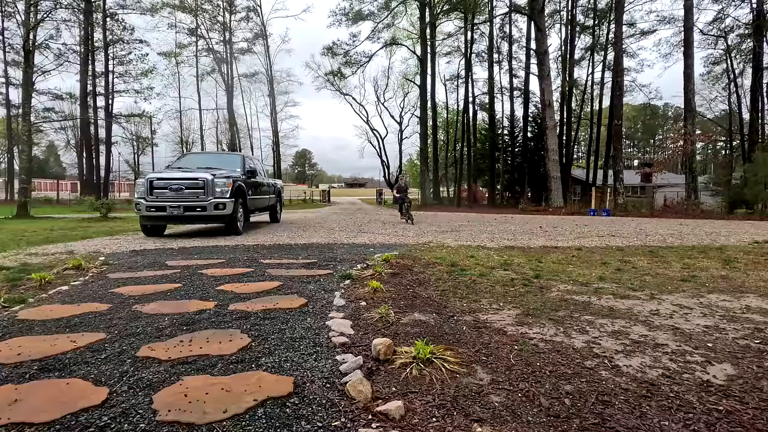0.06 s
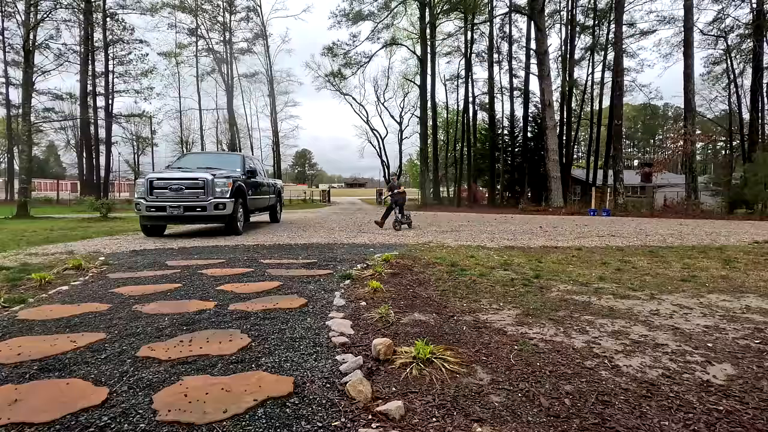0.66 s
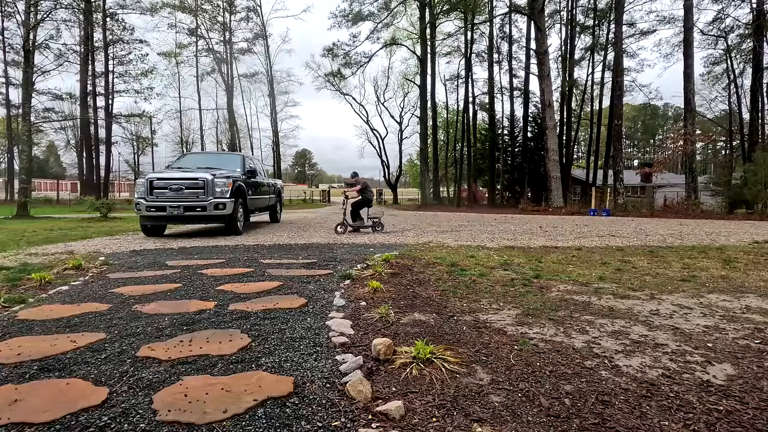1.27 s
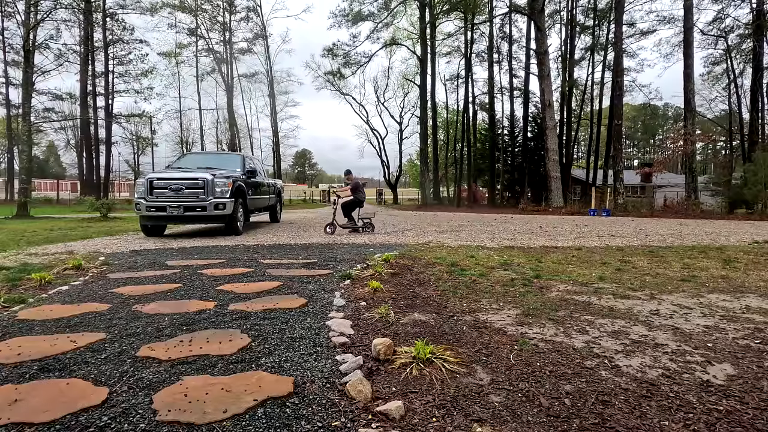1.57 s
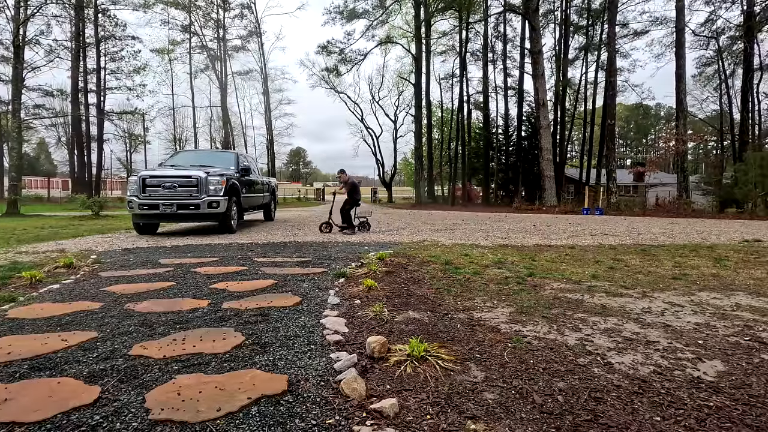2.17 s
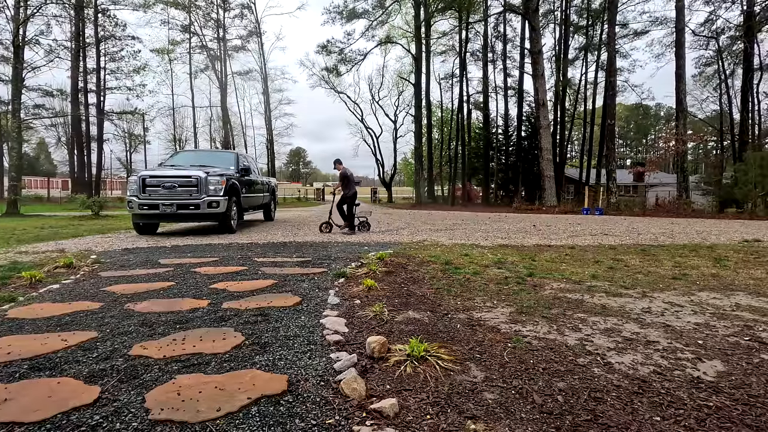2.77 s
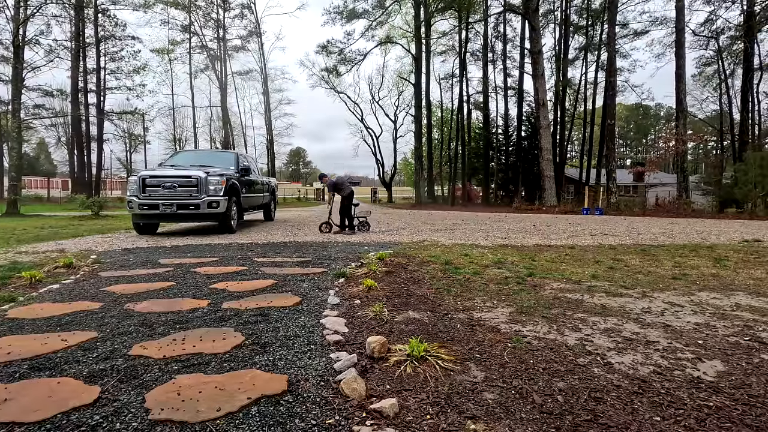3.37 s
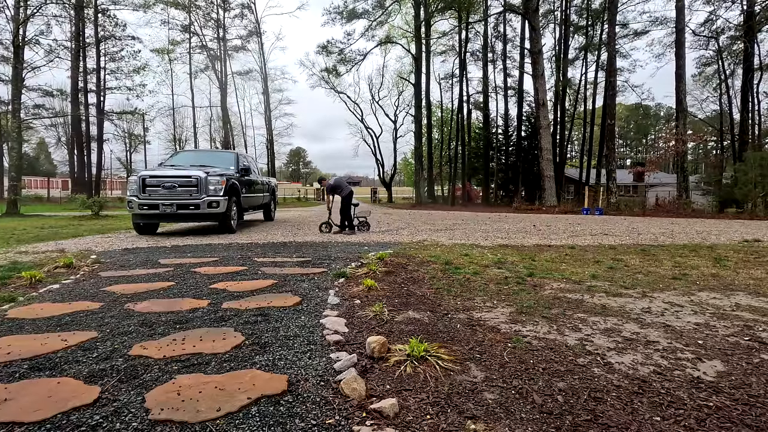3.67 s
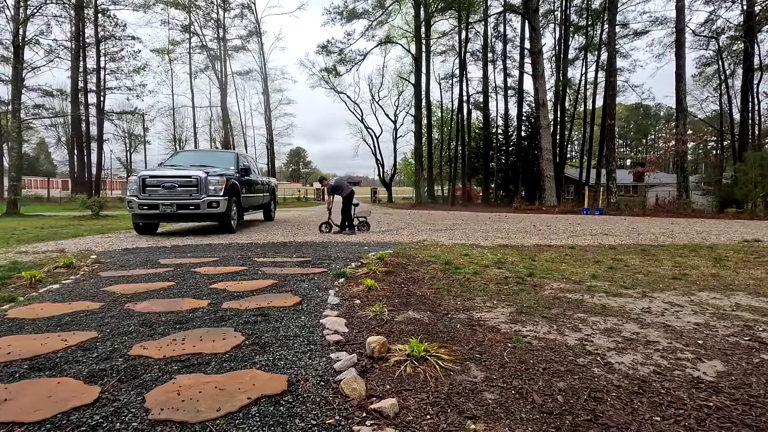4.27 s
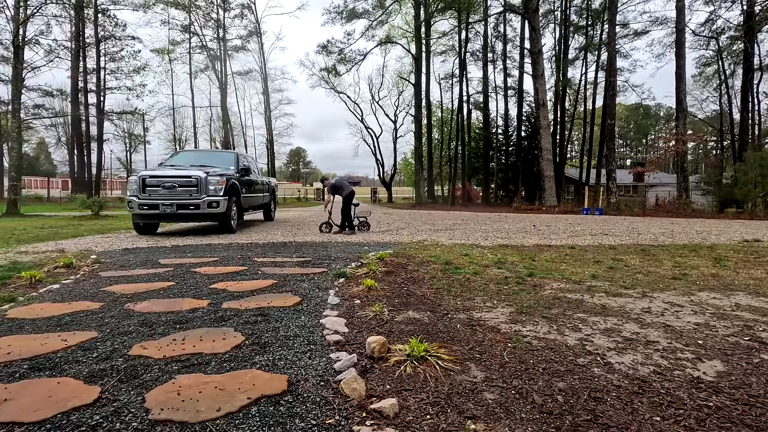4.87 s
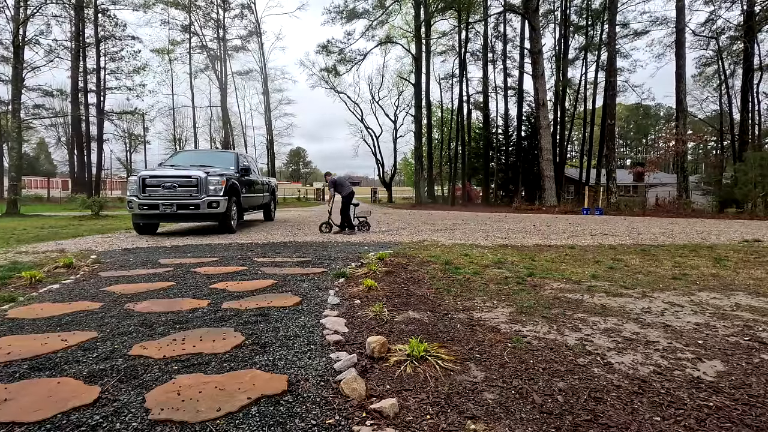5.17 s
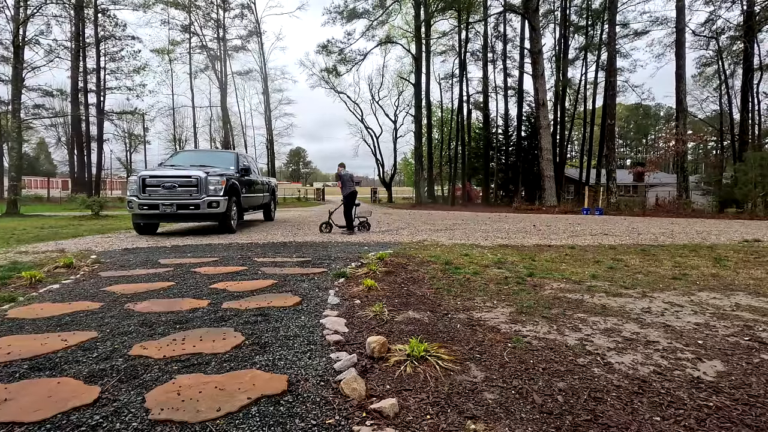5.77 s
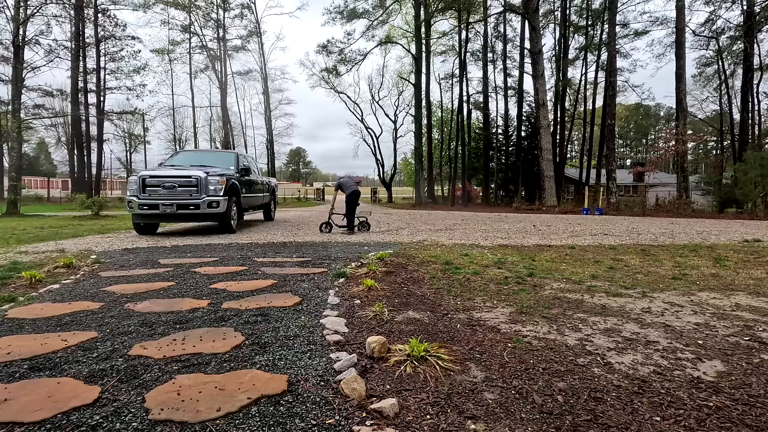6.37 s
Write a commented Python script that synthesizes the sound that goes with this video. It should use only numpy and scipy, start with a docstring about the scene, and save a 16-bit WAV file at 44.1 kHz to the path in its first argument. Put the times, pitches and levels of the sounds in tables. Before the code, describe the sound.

Outdoors among trees, small scooter wheels grind through gravel with snapping pebbles and hollow knocks, then slow to a halt. In the quiet that follows come light foot scuffs, small ticks and chirping birds. Past the middle, a sharp metal clack rings out with thumps from the deck. The birdsong grows louder over a soft traffic hum and rustling trees, with the scooter heard near the centre.

```python
"""A small scooter rolls over a gravel drive: the tyres rumble, stones crunch and bumps rattle hollowly. After
two seconds it stops. Shoes shift on the stones, fittings tick, a songbird warbles among the trees and a far
bird gives long, level calls. At 4.6 s a loud latch-like clack comes with duller knocks of the deck. All along,
a low traffic hum and the wash of the trees sound, and the background grows steadily louder, holding steady near
the end."""
import sys
import numpy as np
from scipy import signal
from scipy.fft import rfft, irfft, next_fast_len
from scipy.io import wavfile
from scipy.ndimage import uniform_filter1d

SR = 44100
rng = np.random.default_rng(int(sys.argv[2]) if len(sys.argv) > 2 else 0)


def wav_record(signal):
    """Record a signal, one row per channel, as 16-bit PCM in the file named by sys.argv[1]."""
    frames = np.transpose(np.atleast_2d(signal))
    bounded = np.clip(frames, -1, 1)
    # unit amplitude maps onto the largest positive 16-bit level
    quanta = np.round(bounded * 32767).astype(np.int16)
    wavfile.write(sys.argv[1], SR, quanta)


N = 287091
TIME = np.arange(N) / SR


def amp(db):
    """Decibels to amplitude ratio."""
    return 10 ** (np.asarray(db) / 20)


def unit(x):
    """Normalisation to rms 1."""
    return x / np.sqrt(np.mean(x ** 2) + 1e-20)


def read(points, hz):
    """Interpolation of a table on a log-frequency axis."""
    f, value = np.transpose(points)
    return np.interp(np.log(hz + 1), np.log(f + 1), value)


def add(mix, s, sound):
    """Superposition: a sound joins the mix at time s."""
    part = mix[max(round(s * SR), 0):][:len(sound)]
    part += sound[:len(part)]


def colour(x, points):
    """Spectral shaping by a table of gains, at rms 1."""
    return unit(irfft(rfft(x) * amp(read(points, np.fft.rfftfreq(len(x), 1 / SR))), len(x)))


def noise(points, size=N):
    """Filtered Gaussian noise of a given spectrum."""
    return colour(rng.standard_normal(size), points)


def wander(hz, size=N):
    """Random modulation: noise low-passed at hz, at rms 1."""
    n = next_fast_len(max(size, SR // 5))
    rolloff = 1 + (np.fft.rfftfreq(n, 1 / SR) / hz) ** 4
    return unit(irfft(rfft(rng.standard_normal(n)) / rolloff, n))[:size]


def hump(s, length):
    """A raised-cosine pulse of height 1 centred on time s."""
    return np.cos(np.pi * np.clip((TIME - s) / length, -.5, .5)) ** 2


def swell(db, db_per_s, until_s=5.78):
    """Exponential growth: a gain that climbs to db, then holds."""
    return amp(db + db_per_s * np.minimum(TIME - until_s, 0))


def patchy(x, depth_db, span_s, span_hz):
    """Random amplitude modulation: each region of the spectrum swells and fades on its own."""
    hz, t, z = signal.stft(x, SR, nperseg=512, noverlap=384)
    field = rng.standard_normal(z.shape)
    for axis, size in enumerate([span_hz / hz[1], span_s / t[1]]):
        field = uniform_filter1d(field, max(int(size), 1), axis)
    return unit(signal.istft(z * amp(depth_db * unit(field)), SR, nperseg=512, noverlap=384)[1][:N])


def impacts(per_s, spread_db):
    """A Poisson train of impulses: many small, a few large."""
    size = amp(spread_db * np.minimum(rng.exponential(1, N), 4))
    return unit(size * rng.choice([-1, 1], N) * (rng.random(N) < per_s / SR))


def bounce(x, share, delay_s=.00345):
    """Comb filtering: one early reflection off a hard surface interferes with the direct sound."""
    return (x + share * np.interp(TIME - delay_s, TIME, x, left=0)) / np.hypot(1, share)


def trees(x, wet_db):
    """Reverberation by scattering: trunks return a thin tail, each band decaying at its own rate."""
    # decay of the tail: frequency_hz, t60_s
    decay = [(200, 0.14), (1200, 0.5), (3500, 0.32), (12000, 0.32)]
    echoes = rng.standard_normal(SR) * (rng.random(SR) < 2000 / SR) * (TIME[:SR] > .008)
    hz, t, z = signal.stft(echoes, SR, nperseg=256)
    tail = signal.istft(z * amp(-60 * t / read(decay, hz)[:, None]), SR, nperseg=256)[1]
    return x + amp(wet_db) * signal.fftconvolve(x, tail / np.linalg.norm(tail))[:N]


def diffuse(x, width):
    """A diffuse field: sound scattered from all around arrives with unrelated phases."""
    hz, t, z = signal.stft(x, SR, nperseg=512, noverlap=384)
    z = z * np.exp(2j * np.pi * rng.random(z.shape)) * amp(read(width, hz))[:, None]
    return signal.istft(z, SR, nperseg=512, noverlap=384)[1][:N]


def air():
    """Broadband ambient noise: far traffic hum, a gusty wash from the trees and a thin hiss."""
    # spectra of the three layers: frequency_hz, density_db
    hum_spectrum = [(12, -62), (20, -34), (32, -15), (64, 0), (87, 2.5), (129, 3.5), (177, -2.5),
                    (211, -14.5), (261, -11), (300, -12.5), (330, -4), (430, -13), (730, -120)]
    wash_spectrum = [(120, -33), (200, 3.5), (260, 1), (330, -1.5), (400, -1), (550, -4), (950, -4),
                     (1400, -9), (1870, -15.5), (2600, -16), (3770, -18.5), (4600, -24), (5200, -47),
                     (7000, -66)]
    hiss_spectrum = [(2650, -26), (4500, -5.5), (5200, -7), (6000, -8), (6800, -7.5), (8400, -11),
                     (11000, -15.5), (15000, -17), (16000, -26)]
    # soft gusts in the trees: middle_s, length_s, extra_db
    gusts = [(3.474, 0.43, 3), (4.25, 0.28, 1.5)]
    gust_db = sum(db * hump(s, length) for s, length, db in gusts)
    wash = patchy(noise(wash_spectrum), depth_db=3, span_s=.049, span_hz=200)
    hiss = patchy(noise(hiss_spectrum), depth_db=3, span_s=.031, span_hz=400)
    return (swell(-40.5, db_per_s=2.5) * noise(hum_spectrum)
            + swell(-41.5 + gust_db, db_per_s=2) * wash
            + swell(-55, db_per_s=1.77) * hiss)


def bird(notes, waver, waver_hz, flutter_db, harmonics=((1, 0),)):
    """Frequency modulation: notes glide through three pitches, trembling by the fraction waver."""
    out = np.zeros(N)
    for s, length, start, middle, end, db in notes:
        n = int(length * SR)
        glide_hz = np.polyval(np.polyfit([0, .5, 1], [start, middle, end], 2), np.linspace(0, 1, n))
        hz = glide_hz * (1 + waver * wander(waver_hz, n))
        phase = 2 * np.pi * np.cumsum(hz) / SR
        tone = sum(amp(level) * np.sin(round(k) * phase) for k, level in harmonics)
        flutter = amp(flutter_db * wander(99, n))
        add(out, s, amp(db) * unit(tone * flutter) * signal.windows.tukey(n, .35))
    return out


def chatter(count=240):
    """Randomly timed frequency sweeps: faint chirps from deeper in the wood, growing louder."""
    when, pitch, slope, faintness, length = rng.random((5, count))
    start_s, length_s = 2 + 4.5 * when, .014 + .03 * length
    hz, glide = 2400 + 2100 * pitch, 1 + .2 * (slope - .5)
    notes = np.c_[start_s, length_s, hz / glide, hz, hz * glide, -9 * faintness]
    return swell(-50, db_per_s=3) * bird(notes, waver=.011, waver_hz=200, flutter_db=4)


def far_bird():
    """A missing fundamental: level, slightly throbbing calls whose second harmonic carries furthest."""
    # calls: start_s, length_s, start_hz, middle_hz, end_hz, level_db
    calls = [(2.43, .35, 605, 620, 611, -52), (3.85, 0.32, 608, 621, 607.5, -50),
             (4.17, 0.23, 618, 630, 604, -53.5), (5.715, 0.153, 611.6, 608.5, 619.5, -42),
             (5.88, .135, 606, 619, 630, -42)]
    # overtones of the voice: harmonic_number, level_db
    throat = [(2, 3), (3, -13.5), (4, -11), (5, -58), (6, -8)]
    return trees(bird(calls, waver=.005, waver_hz=70, flutter_db=2.5, harmonics=throat), wet_db=-5)


def syllables(rows, oct_per_s, waver):
    """Exponential sweeps: notes of one kind glide at the same rate and tremble alike."""
    points = np.array([0, .5, 1])
    notes = [(s, length, *hz * 2 ** (oct_per_s * length * points), db) for s, length, hz, db in rows]
    return bird(notes, waver=waver, waver_hz=270, flutter_db=2.5)


def songbird():
    """Modulated pure tones: slight tremble leaves a note clean; deep tremble adds raspy sidebands."""
    # four kinds of syllable: start_s, length_s, start_hz, level_db
    whistles = [(2.557, 0.036, 3200, -51), (3.204, 0.029, 3180, -47), (3.724, .05, 2740, -53),
                (3.799, 0.037, 3220, -54), (3.898, .049, 4280, -50), (4.205, 0.036, 4540, -52),
                (4.242, 0.045, 3770, -54), (4.43, 0.25, 4600, -52.5), (4.792, 0.038, 4630, -47.5),
                (5.115, 0.02, 3700, -46.5), (5.183, .041, 2900, -47.5), (6.085, .08, 3480, -47),
                (6.374, 0.041, 3850, -48.5)]
    rises = [(2.751, 0.043, 2070, -51), (3.25, 0.21, 3220, -59.5), (3.4, .047, 2070, -53),
             (3.5, 0.055, 3800, -57), (5.226, 0.084, 2176, -42), (5.599, 0.045, 2120, -45),
             (6.015, 0.062, 2160, -42.5), (6.435, 0.082, 2174, -38.5)]
    falls = [(2.04, .086, 4600, -59), (2.49, 0.037, 3350, -57), (2.745, 0.032, 3500, -54),
             (4.822, 0.067, 4250, -43.5), (5.455, 0.098, 4650, -42.5), (5.915, 0.026, 3050, -44),
             (6.152, 0.048, 3450, -41)]
    buzzes = [(4.97, 0.095, 3090, -41), (5.618, 0.073, 2740, -44.5)]
    return (syllables(whistles, oct_per_s=0, waver=.008)
            + syllables(rises, oct_per_s=2.5, waver=.008)
            + syllables(falls, oct_per_s=-6.3, waver=.0515)
            + syllables(buzzes, oct_per_s=0, waver=.086))


def crunch(per_s, spread_db, clump_db, ring_s, kinds=10):
    """Shot noise: stones collide in clumps, each kind with its own short impulse response."""
    # spectrum of grinding stones: frequency_hz, density_db
    spectrum = [(880, -12), (1500, -18), (1610, -6), (1760, -4), (1880, -9), (2160, -15.5), (2300, -8),
                (3620, -2), (4590, -2.5), (5050, 0.5), (6310, 1.5), (7760, -1.5), (11800, -11.5),
                (16000, -28)]
    out, t = np.zeros(N), TIME[:700]
    for _ in range(kinds):
        clatter = unit(rng.standard_normal(len(t)) * np.exp(-t / ring_s))
        out += signal.oaconvolve(impacts(per_s / kinds, spread_db), clatter)[:N]
    return colour(out * amp(clump_db * wander(30)), spectrum)


def shoes():
    """Granular friction: light, sparse crunches as the rider shifts weight."""
    # scuffs on the stones: start_s, length_s, level_db
    scuffs = [(2.007, 0.3, -60), (2.23, .07, -53.5), (2.734, 0.22, -60.5), (3, 0.31, -53),
              (3.287, 0.4, -61.5), (4.68, 0.21, -53), (5.375, 0.11, -47), (5.572, 0.093, -47),
              (5.664, 0.27, -46.5), (5.876, 0.3, -56)]
    weight = np.zeros(N)
    for s, length, db in scuffs:
        add(weight, s, amp(db) * signal.windows.tukey(int(length * SR), .6))
    grains = crunch(per_s=900, spread_db=4, clump_db=2, ring_s=.0017)
    return weight * patchy(grains, depth_db=3, span_s=.02, span_hz=700)


def ticks(half_width_oct=.63, rise_s=.00057):
    """Impact transients: small hard contacts excite dense modes that die in hundredths of a second."""
    # pebbles and fittings snapping: start_s, relative_db, t60_s, centre_hz
    contacts = [(.08, -14.5, .03, 6000), (.117, -11, 0.019, 6400), (.177, -14, .035, 7000),
                (0.262, -19, .04, 5970), (0.375, -17, .024, 5000), (.513, -12, .016, 4900),
                (2.014, -34.5, .023, 7360), (2.358, -30, 0.022, 3900), (3.19, -41, 0.037, 6000),
                (3.513, -37, .02, 4000), (4.173, -33.5, 0.031, 4200), (5.05, -32, 0.043, 4700),
                (5.258, -28.5, 0.03, 4960), (5.418, -38, .03, 6000), (5.581, -33.5, .03, 8000),
                (5.691, -34, .02, 7000), (5.735, -29.5, 0.056, 7000)]
    out, t = np.zeros(N), TIME[:SR // 8]
    grid_hz = np.geomspace(100, SR / 2, 40)
    air_db = -10 * np.log10(1 + (grid_hz / 11500) ** 8)  # distance dulls the top
    for s, db, t60, hz in contacts:
        band_db = -10 * np.log10(1 + (np.log2(grid_hz / hz) / half_width_oct) ** 4)
        stone_db = 3 * rng.standard_normal(len(grid_hz))  # each contact has its own colour
        ring = noise(np.c_[grid_hz, band_db + air_db + stone_db], len(t))
        add(out, s, ring * amp(db - 3.5 - 60 * t / t60) * (1 - np.exp(-t / rise_s)))
    return out


def knocks(rise_s=.0014):
    """Modal ringing: blows ring the hollow deck, each with its own brightness and ring time."""
    # blows: start_s, level_db, t60_factor, tilt_db_per_octave
    blows = [(0.121, -36, 0.76, 7), (.405, -18, 1.1, -1), (0.503, -22, 0.74, 10), (1.046, -13, 2, 3),
             (1.195, -37, .8, 2), (1.768, -23, 0.66, -4), (1.899, -22.5, 0.42, -7), (2.007, -24, 0.23, 4),
             (2.255, -25.5, 0.34, -4), (4.64, -14.5, 1.3, 1), (4.657, -13.5, 0.49, 3.5),
             (4.677, -12.5, 0.57, -4), (4.915, -28.5, 2.5, -3), (5.735, -24.5, 1.12, 12.5)]
    # modes of the deck: frequency_hz, level_db, t60_s
    deck = [(200, -16.5, 0.14), (307, -3.5, 0.11), (362.3, -12, 0.22), (473, -11.5, 0.028),
            (588, -23.5, 0.17), (623, -16.5, 0.075), (730, -19, 0.024)]
    out, t = np.zeros(N), TIME[:SR // 3]
    for s, db, t60_factor, tilt in blows:
        ring = np.zeros(len(t))
        for hz, mode_db, t60 in deck:
            envelope = amp(mode_db + tilt * np.log2(hz / 300) - 60 * t / (t60 * t60_factor))
            ring += envelope * np.sin(2 * np.pi * hz * t)
        add(out, s, amp(db) * ring * (1 - np.exp(-t / rise_s)))
    return out


def latch():
    """Friction, then free decay: metal scrapes for a moment and rings out."""
    # the latch slides and seats: start_s, level_db, hold_s, t60_s
    strokes = [(4.634, -19, 0.0089, 0.037), (4.646, -21, 0.005, 0.067)]
    # spectrum of the metal: frequency_hz, density_db
    spectrum = [(820, -52), (1400, -20), (1800, -14), (2250, -9.5), (2650, 1.5), (3000, -6), (3360, -8),
                (3650, -6), (4570, -9.5), (6080, -4.5), (8500, -11.5), (9230, -8), (10800, -19),
                (13900, -18), (16000, -32)]
    out, t = np.zeros(N), TIME[:SR // 4]
    for s, db, hold, t60 in strokes:
        add(out, s, noise(spectrum, len(t)) * amp(db - 60 * np.maximum(t - hold, 0) / t60))
    return out


def pings(per_s, spread_db, variants=5, ring_s=.0065, length_s=2):
    """Damped resonance: pebbles of several sizes knock together and ring briefly."""
    # pebble resonances: pitch_hz
    pitches = [1480, 1820, 2990, 3424, 3920, 4625, 5340, 5800, 6230, 6930, 7990]
    out, t = np.zeros(N), TIME[:SR // 25]
    hits = int(length_s * per_s / variants / len(pitches))
    for hz in np.repeat(pitches, variants):
        ping = np.sin(2 * np.pi * hz * rng.uniform(.94, 1.06) * t) * np.exp(-t / ring_s)
        for s, size in zip(rng.uniform(0, length_s, hits), rng.exponential(1, SR // 100)):
            add(out, s, amp(spread_db * min(size, 3)) * np.sqrt(hz) * ping)
    return out / np.std(out[:length_s * SR])


def gravel(force_db):
    """Granular collisions under the wheels: more force makes them louder and brighter."""
    grains = crunch(per_s=4000, spread_db=2.5, clump_db=.2, ring_s=.0028)
    grit = patchy(grains, depth_db=2.5, span_s=.024, span_hz=598)
    fizz = signal.sosfiltfilt(signal.butter(3, 9500, "high", fs=SR, output="sos"), grit)
    stones = (amp(-.18) * unit(grit - fizz)
              + amp(-10 + .37 * force_db) * unit(fizz)
              + amp(-7.5) * pings(per_s=700, spread_db=2.5))
    return bounce(amp(-20.5 + force_db) * stones, share=.33)


def rattle(force_db):
    """Filtered shot noise: random bumps ring through a set of narrow peaks, giving a hollow rattle."""
    # peaks that colour the rattle: frequency_hz, bandwidth_hz, level_db
    peaks = [(157, 10, -14), (206, 22, -7.5), (313.6, 21, 1.5), (364, 31, 3), (402.4, 22, 3),
             (530, 76, -1.5), (614.4, 28.5, 1), (696, 19, 1.5), (784, 59, 1.5), (830, 27, -3.5),
             (880, 12, -3.5), (1032, 63, -3.5), (1132, 43, -5), (1229, 47, -1.5), (1405, 75, -1.5),
             (1512, 94, -3), (1770, 150, -16), (2033, 44, -8.5), (2264, 85, -11.5)]
    t = TIME[:SR // 4]
    ring = np.zeros(len(t))
    for k, (hz, width, db) in enumerate(peaks):
        envelope = amp(db) * np.sqrt(width) * np.exp(-np.pi * width * t)
        ring += (-1) ** k * envelope * np.sin(2 * np.pi * hz * t)
    bumps = impacts(per_s=1000, spread_db=1.8)
    shaking = bounce(signal.oaconvolve(bumps, ring)[:N], share=.24)
    return amp(-25.5 + force_db) * patchy(shaking, depth_db=2.5, span_s=.04, span_hz=250)


def tyres():
    """Rolling noise: crunch, rattle and rumble all follow how hard the tyres work the gravel."""
    # effort from push-off to braking: time_s, level_db
    drive = [(0, -10.5), (.35, -10), (.735, -5.5), (.775, -2), (1.06, -0.5), (1.42, -4), (1.71, -12.5),
             (1.775, -24), (1.98, -25)]
    # a wheel ploughs through heaped stones: middle_s, length_s, extra_crunch_db, extra_rattle_db
    heaps = [(0.117, 0.073, 4, 8), (.167, .055, 10, 6), (0.4, 0.2, 0.5, 4), (0.508, 0.093, 2.5, 7.5),
             (0.766, 0.045, 3.5, 4.5), (0.823, 0.055, 3.5, 3.5), (0.868, 0.074, 3, 4), (0.991, 0.042, 2, 7),
             (1.045, 0.091, 4.5, 5), (1.387, 0.058, 2.5, -1), (1.448, 0.051, 0.5, 6)]
    # spectrum of the tyre rumble: frequency_hz, density_db
    rumble_spectrum = [(20, -18), (45, -4), (70, -1.5), (100, 9.5), (125, 8), (155, 5.5), (178, 1.5),
                       (200, -1.5), (250, 3.5), (300, -19), (450, -32)]
    drive_db = np.interp(TIME, *np.transpose(drive))
    crunch_db, rattle_db, rumble_db = drive_db.copy(), .75 * drive_db, -37.5 + .16 * drive_db
    for s, length, extra_crunch_db, extra_rattle_db in heaps:
        heap = hump(s, length)
        crunch_db += extra_crunch_db * heap
        rattle_db += extra_rattle_db * heap
    rolling = np.interp(TIME, [1.975, 1.987], [1, 0])  # the wheels stop
    return rolling * (gravel(crunch_db) + rattle(rattle_db) + amp(rumble_db) * noise(rumble_spectrum))


def scene():
    """Mid-side stereo: distant sources reach both ears alike, and only diffuse sound adds width."""
    # diffuse shares of the scooter and the yard: frequency_hz, gain_db
    scooter_width = [(60, -26), (400, -32.5), (1500, -28.5), (15000, -20.5)]
    yard_width = [(30, -18), (120, -40), (500, -29), (2000, -25.5), (7000, -10), (14000, 1)]
    ride = trees(tyres(), wet_db=-25)
    scooter = ride + trees(shoes() + ticks() + latch() + knocks(), wet_db=-11.5)
    song = amp(-2.5) * trees(songbird(), wet_db=-1.5) + amp(-5) * trees(chatter(), wet_db=3)
    yard = song + far_bird() + air()
    mid = scooter + yard
    side = diffuse(scooter, scooter_width) + diffuse(yard, yard_width)
    return np.array([mid + side, mid - side])


def record(dry, edge_hz=15900):
    """Band limiting: a linear-phase low-pass removes the highest treble."""
    lowpass = signal.firwin(511, edge_hz, window=("kaiser", 9), fs=SR)
    return signal.oaconvolve(dry, lowpass[None], "same")


dry = scene()
out = record(dry)
wav_record(out)
```